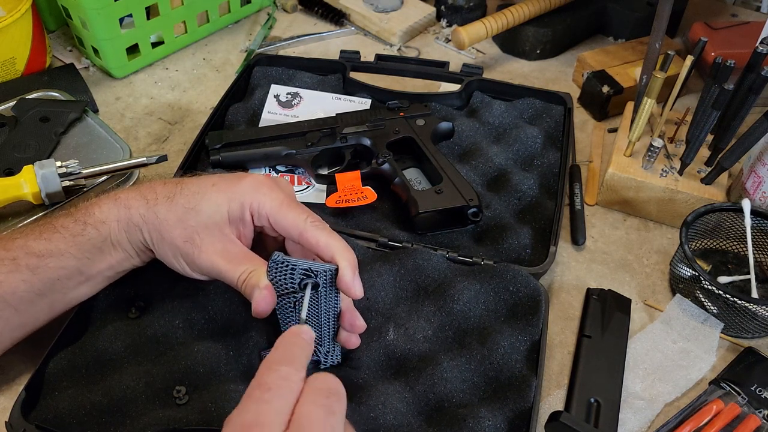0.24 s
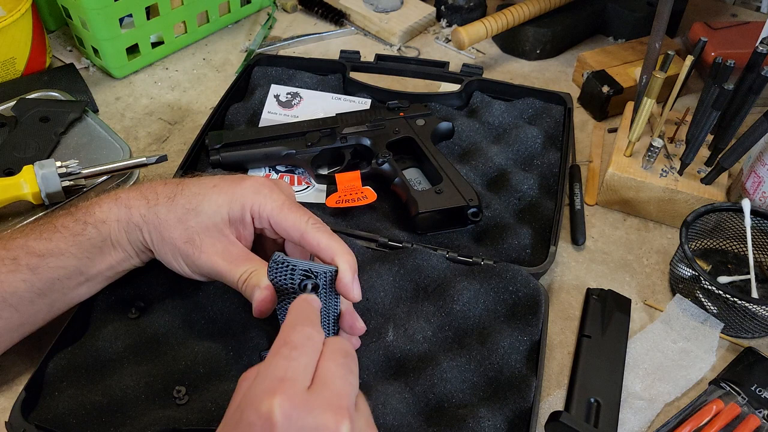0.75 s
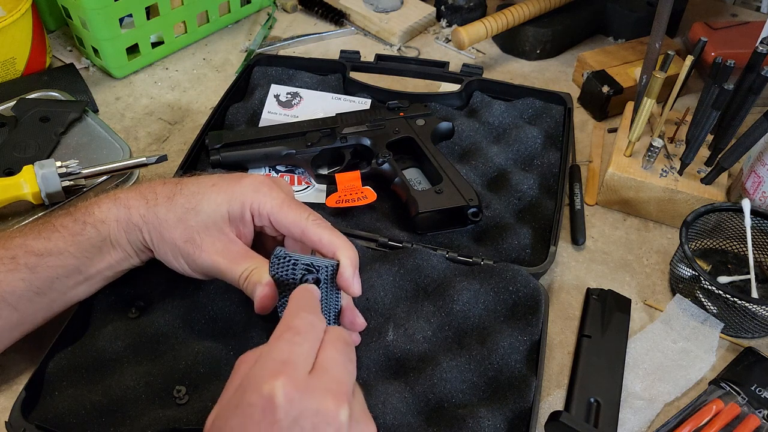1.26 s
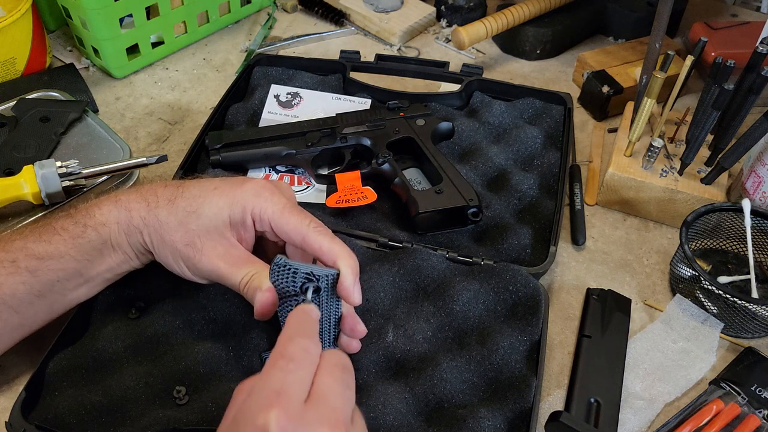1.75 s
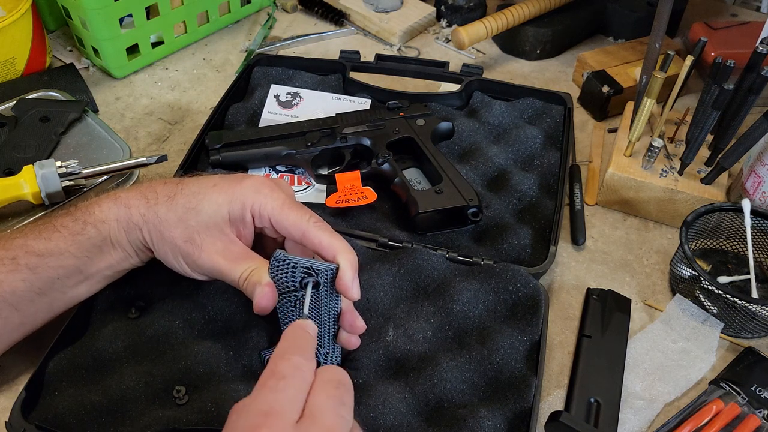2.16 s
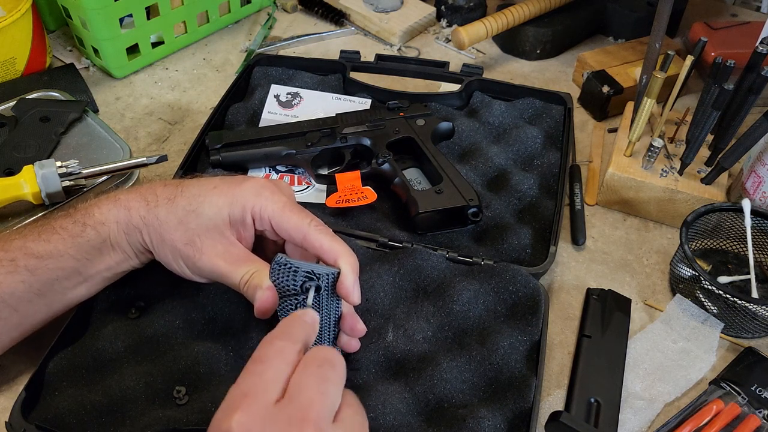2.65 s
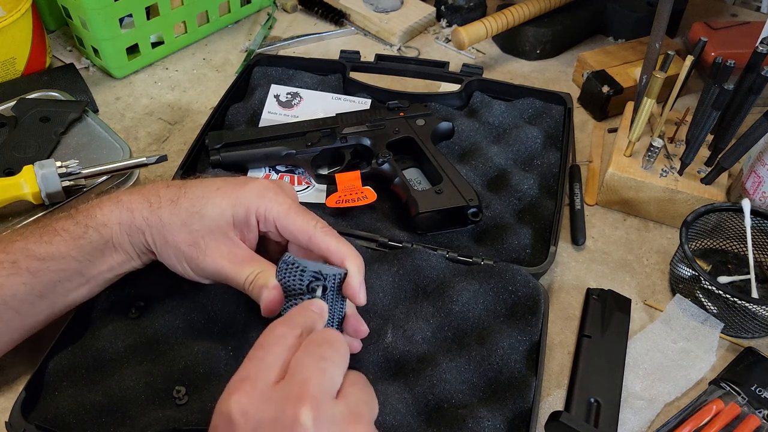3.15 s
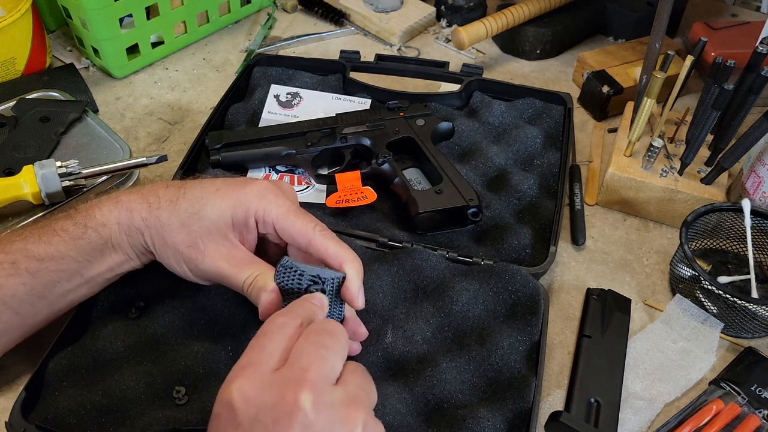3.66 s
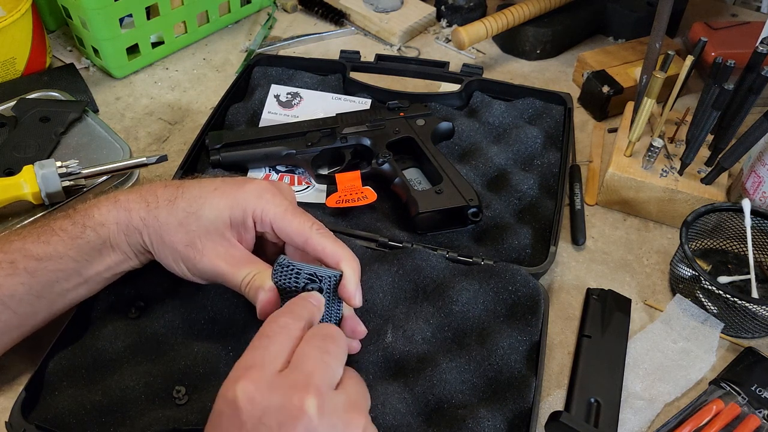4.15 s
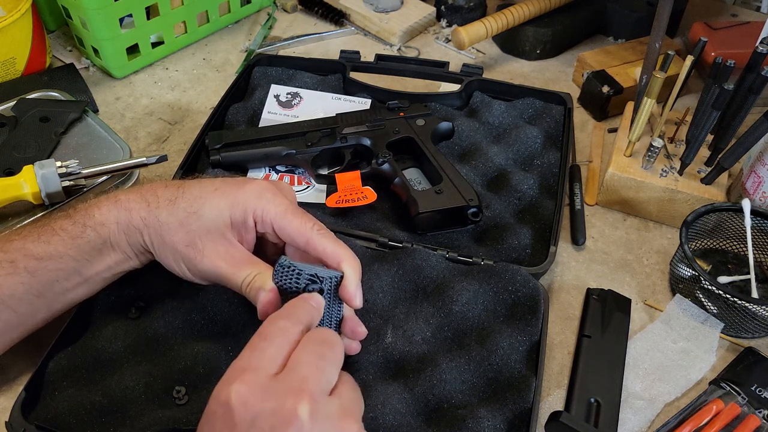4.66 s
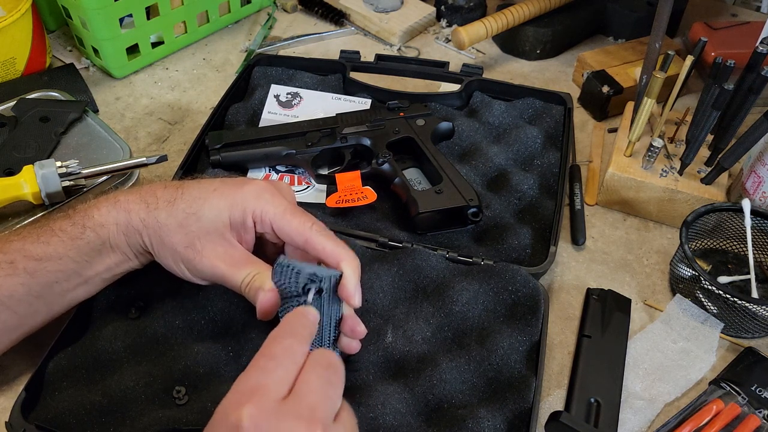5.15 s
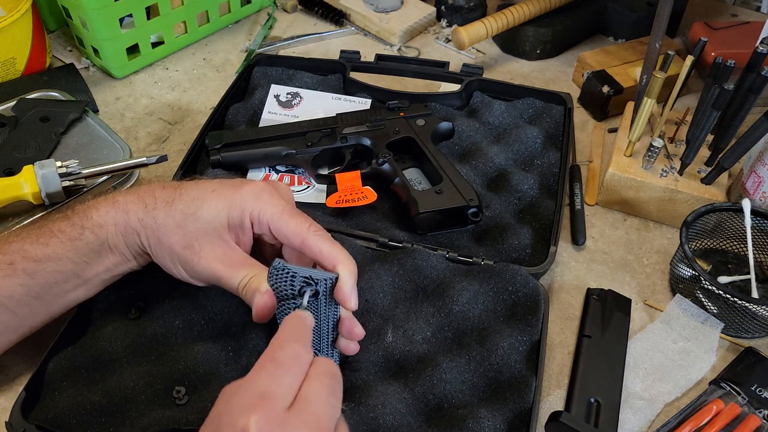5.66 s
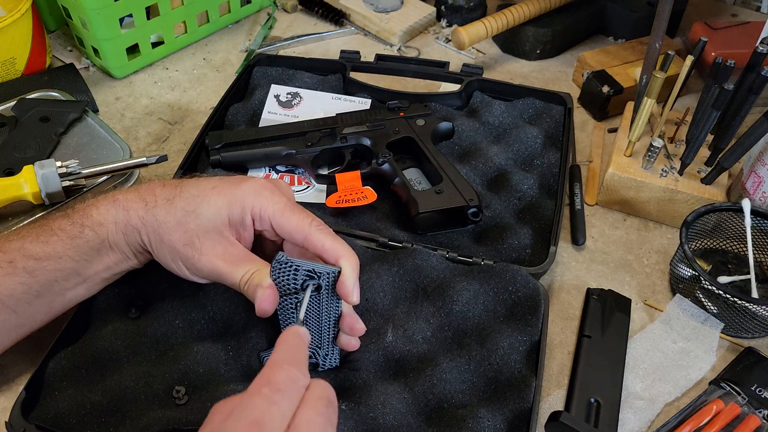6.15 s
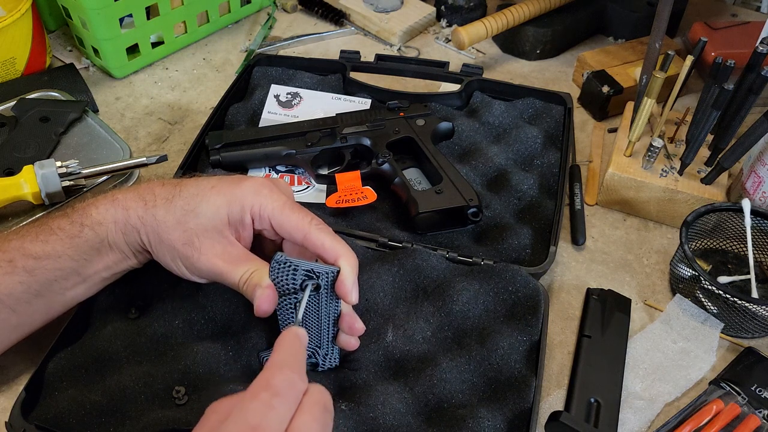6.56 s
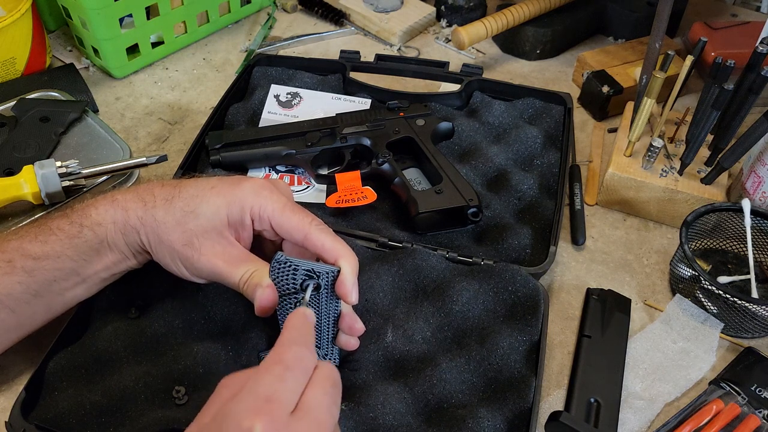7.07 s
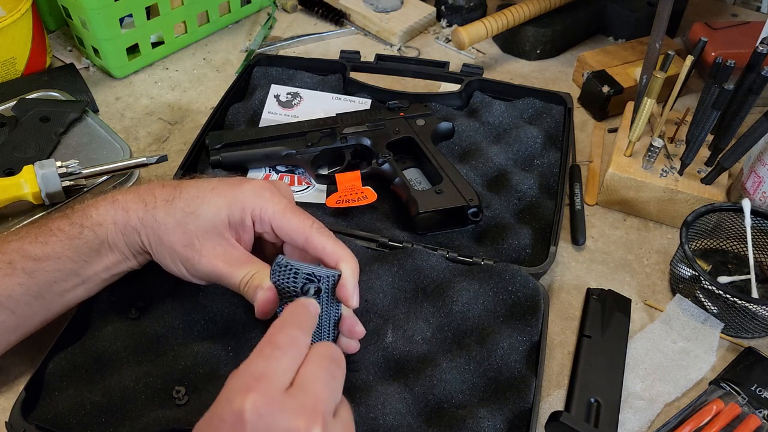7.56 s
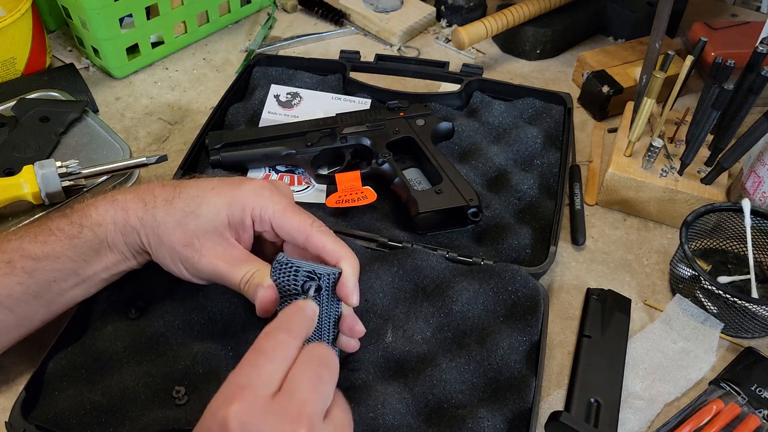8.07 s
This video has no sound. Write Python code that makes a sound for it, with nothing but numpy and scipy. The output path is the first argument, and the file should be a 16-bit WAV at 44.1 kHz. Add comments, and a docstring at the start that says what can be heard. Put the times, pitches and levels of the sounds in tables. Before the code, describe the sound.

Close, dry filing of a plastic piece: bright harsh pushes alternate with softer rising drawback scrapes, about two cycles a second, over faint hum.

```python
"""Filing a screw hole in plastic

A needle file rasps to and fro in the screw hole of a hand-held plastic grip panel, in a quiet workshop.
Its teeth tear off tiny chips (random clicks over noise) and set the panel ringing (a bank of modes); the blade's
gliding resonance rises on the pulls and falls on most pushes. Many pushes catch and bite a second time.
Under it: rim taps, soft bumps and rustle of the hands, still air, mains hum and a low drone."""
import sys
import numpy as np
from scipy import signal
from scipy.fft import rfft, irfft, next_fast_len
from scipy.io import wavfile
from scipy.ndimage import uniform_filter1d

SR = 44100
rng = np.random.default_rng(int(sys.argv[2]) if len(sys.argv) > 2 else 0)


def wav_out(sig):
    """Save sig, one row per channel (or a flat mono array), as 16-bit PCM at SR to the path in sys.argv[1]."""
    wavfile.write(sys.argv[1], SR, np.round(np.clip(np.atleast_2d(sig).T, -1, 1) * 32767).astype(np.int16))


N = 366471
TIME = np.arange(N) / SR  # seconds
SIZE = next_fast_len(N + 8192, True)  # transform length, with room for filter tails
HZ = np.fft.rfftfreq(SIZE, 1 / SR)
RECORDER_EDGE_HZ = 15900

# Still air of the workshop. Each row: frequency in Hz, relative level in dB.
AIR_COLOUR = [(20, -15), (90, -6.5), (200, -3), (400, -7.5), (1000, -11.5), (2000, -17), (4000, -18),
              (8000, -24), (16000, -30)]
# Mains hum. Each row: frequency in Hz, rms level in dB before the lean to the left.
HUM_PARTIALS = [(119.9, -70.5), (239.9, -79), (359.7, -85.5)]
# A low drone beside the hum, fading after an early swell. Each row: time in seconds, rms level in dB.
DRONE_LEVEL = [(0, -68), (.8, -70), (1.9, -64), (2.4, -75.5), (8.31, -79)]
# Ring of the workshop. Each row: frequency in Hz, time to fall by 60 dB in seconds.
ROOM_DECAY = [(200, 1), (1000, 0.22), (4000, 0.28), (14000, 0.17)]

# Low rustle of the working hands. Each row: time in seconds, basic level in dB.
RUSTLE_LEVEL = [(0.0, -66.5), (0.9, -75), (1.6, -73), (2.3, -72), (3.2, -70.5), (4.3, -67), (4.9, -68.5),
                (5.5, -70), (6.2, -73), (7.0, -71.5), (8.31, -75.5)]
# Colour of that rustle. Each row: frequency in Hz, relative level in dB.
RUSTLE_COLOUR = [(20, -21), (45, -26), (70, -10), (105, -3.5), (125, -23), (160, -16.5), (300, -51),
                 (1000, -72)]
# The hands take up the end of a stroke. Each row: start in seconds, level in dB before the lean to the left,
# pitch in Hz, decay time in seconds.
BUMPS = [(0.688, -63, 115, 0.031), (1.303, -69, 112, 0.026), (1.963, -55, 154, 0.012),
         (2.559, -58, 134, 0.011), (3.674, -65, 113, 0.017), (4.76, -53, 105, 0.014),
         (4.834, -52, 40.4, 0.02), (4.868, -53, 49.7, 0.015), (5.031, -61, 90, 0.018),
         (5.862, -57, 111, 0.027)]

# Broad colour beneath the panel's modes. Each row: frequency in Hz, left gain in dB, right gain in dB.
BROAD_COLOUR = [(253, -24, -25), (472, -27, -35), (995, -19.5, -15.5), (1640, -16.5, -18),
                (2900, -19, -14.5), (4550, -21.5, -19.5), (5620, -9, -8.5), (7070, -1.5, -5.5),
                (9150, -2, -7), (8960, -4.5, -12.5), (11770, -14, -16.5), (12530, -5, -11.5),
                (14100, -9.5, -10.5), (14500, -11, -14)]
# Modes of panel, file and cupped hand. Each row: frequency in Hz, width in Hz, lift at the left port in dB,
# lift at the right port in dB, extra left lead in radians.
PANEL_MODES = [(385, 67, 15.5, 15, 0.3), (556, 110, 9, 10.5, -0.2), (687, 190, 10, 2.5, 0.24),
               (820.6, 16.3, 7, 13, -2), (1007, 255, 8.5, 9, -0.02), (1128.6, 149, 12.5, 5.5, -2.5),
               (1252, 186, 14, 8.5, -0.18), (1856, 110, 5, 4.5, 0.5), (2175, 122, 9.5, -3.5, -0.85),
               (2448, 200, 11.5, 3, 0.5), (2679, 146, 13, 3, -2), (3050, 43, 12, 3, -0.7),
               (3185, 137, 14.5, 7, -1), (3409, 159, 12.5, 10, -6), (3658, 185, 16, 9, -2),
               (3880, 267, 14.5, 0, -3.5), (4160, 260, 8.5, 9.5, -1.1), (4570, 79, 12, 11.5, 0.5),
               (4757, 90, 14, 9.5, 2), (5190, 133, 10, 6.5, 0.4), (5417, 32, 17.5, -6, -1.8),
               (5890, 400, 8, 9, -0.6), (6220, 300, 6.5, 1, -0.3), (6515, 220, 7, 1, 0.7),
               (7040, 25, 9, -17, 1), (7630, 330, 6.5, 3.5, -1.4), (8380, 680, 4.5, 1, -0.34),
               (8240, 68, 1, 9.5, 0.5), (8800, 120, 2, 9, -2), (10320, 450, 7, 7.5, -2.5)]
# How the two microphone ports hear the panel. Each row: frequency in Hz, basic left lead in radians,
# likeness of the ports from 0 to 1.
PORTS = [(251, 1.86, 0.45), (783, 0.61, 0.39), (1107, 5.14, 0.99), (1626, 1.36, 0.51), (2780, 2.58, 0.47),
         (3845, 5.94, 0.73), (5100, 3.26, 0.3), (5970, 4.4, 0.52), (6700, 4.64, 0.65), (8300, 4.13, 0.62),
         (9500, 6.6, 0.27), (11000, 6.5, 0.38), (13200, 6.5, 0.26), (15900, 7, 0.1)]

# The file taps the rim of the hole. Each row: start in seconds, peak level in dB at the louder port,
# brightness in Hz.
TAPS = [(0.162, -47, 7000), (0.494, -44, 1300), (1.252, -31.5, 8000), (1.411, -57, 1310),
        (1.762, -46, 4500), (1.896, -35, 8000), (2.057, -61, 9000), (2.336, -41, 6000), (2.497, -33, 11000),
        (2.878, -53, 1206), (4.341, -52, 5000), (4.356, -43, 9000), (5.092, -45, 1510), (5.285, -40, 10000),
        (5.641, -41, 1420), (5.851, -29, 12000), (6.938, -34.5, 7000), (7.517, -40, 8000),
        (7.608, -48, 1200), (7.868, -51, 1400)]

# The file is pushed in, gathering speed. Each row: start in seconds, length in seconds, rise time in seconds,
# rasp of the teeth in dB, swell along the push in dB, and relative to the rasp: panel ring in dB,
# hollow of the hand in dB, low body in dB.
PUSHES = [(-0.062, 0.08, 0.024, -41.5, 0.0, -3, -16.5, -15),
          (0.461, 0.15, 0.036, -46, 0.5, -4.5, -18, -18.5),
          (1.139, 0.11, 0.024, -42, -4.5, -4, -12.5, -16.0),
          (1.754, 0.12, 0.025, -44.0, 2.5, -4.5, -15, -20.5),
          (2.336, 0.131, 0.027, -44.5, 2.5, -4.5, -19, -18.5),
          (2.925, 0.12, 0.04, -44.5, 6, -4.0, -15, -17), (3.507, 0.088, 0.026, -44.0, -1, -4.5, -13.0, -12),
          (4.046, 0.11, 0.029, -44.5, -3.5, -4, -15, -12.5), (4.593, 0.11, 0.042, -42.0, -4, -3, -15, -18),
          (5.157, 0.1, 0.033, -44.0, -2, -3, -15, -17), (5.694, 0.12, 0.03, -45, -9, -2.5, -12.5, -15),
          (6.228, 0.13, 0.047, -46.0, 5.5, -3, -12, -14.0), (6.795, 0.11, 0.04, -44, 0.5, -1, -10, -15.0),
          (7.363, 0.114, 0.032, -45.0, 5, -5.0, -14, -17.5),
          (7.884, 0.132, 0.043, -45.5, 7, -4.0, -14.0, -15)]
# The teeth catch and bite at once. Each row: start in seconds, length in seconds, rasp in dB,
# and relative to it: ring in dB, hollow in dB, body in dB.
BITES = [(0.039, 0.069, -43.5, -5.5, -18, -15), (0.611, 0.098, -44.5, -5.5, -14.5, -13.5),
         (1.105, 0.036, -62.5, 0, -11, -9), (1.264, 0.047, -39.5, -4.5, -9.5, -18),
         (1.892, 0.079, -41.5, -3.5, -10.0, -14.5), (2.486, 0.074, -41, -5, -17, -17.5),
         (3.052, 0.065, -45.5, -5, -16.5, -10.5), (3.6, 0.082, -48.5, -5.5, -15, -9.5),
         (4.159, 0.09, -48, -3.0, -17.5, -8.5), (4.72, 0.079, -46.5, -3.0, -15.0, -11),
         (5.281, 0.064, -45.5, -4.0, -12.5, -16), (5.844, 0.057, -43.5, -5, -8.5, -12.5),
         (6.406, 0.054, -44.5, -4, -9.0, -10), (6.93, 0.0094, -46, -4.5, -9, -5),
         (6.96, 0.053, -43.0, -4, -7.5, -12), (7.507, 0.01, -47, -3.0, -22, -7),
         (7.536, 0.027, -42.5, -3, -8, -18), (7.814, 0.028, -63.5, 2.5, -10, -5),
         (8.038, 0.05, -48, -5, -19, -11)]
# The file is drawn back; midway the hand eases off, almost lifts it, and it only drags. Each row: start in
# seconds, length in seconds, length of the firm part in seconds, rasp in dB, drop on easing in dB,
# dip of the lift in dB, and relative to the rasp: ring in dB, hollow in dB, body in dB.
PULLS = [(0.155, 0.22, 0.11, -51, 10, -2.5, -0.5, -10.5, -15),
         (0.827, 0.208, 0.1, -49.5, 9.5, -2, -3.0, -12.5, -16.5),
         (1.456, 0.19, 0.098, -49.5, 6.5, -4.5, -2.5, -14.0, -19.5),
         (2.058, 0.2, 0.091, -46.5, 9, -2.5, -3.5, -15.5, -18.5),
         (2.651, 0.2, 0.1, -48.5, 7.5, -3, -2.5, -17, -20.5),
         (3.218, 0.19, 0.087, -46.5, 9.5, -8, -3.5, -11.5, -11),
         (3.79, 0.18, 0.096, -47, 10.5, -3, -1.5, -15, -15),
         (4.33, 0.19, 0.098, -47.0, 10, -4, -3, -16, -17), (4.875, 0.19, 0.095, -47, 8.5, -2, -3, -14, -18),
         (5.428, 0.19, 0.082, -47, 11.5, -5, -3.5, -12.5, -16.5),
         (5.988, 0.19, 0.091, -49.5, 11, -3, -2, -10, -16.5),
         (6.521, 0.2, 0.095, -54, 11, -0.5, 0, -6, -13.5), (7.117, 0.17, 0.084, -52, 6, -1, -4, -10, -14.5),
         (7.649, 0.15, 0.11, -49.0, 19, -2.5, -2, -14, -16.5),
         (8.137, 0.162, 0.11, -51.5, 8.5, -1.5, 1.5, -8.5, -12.5)]

# Bands of every stroke: rasp, ring, hollow, body. Each row: low edge in Hz, high edge in Hz.
BAND_EDGES = [(4500, 20000), (1600, 4500), (900, 1600), (200, 900)]
# Power of the speed that sounds each of the four bands: the treble needs more speed than the body. No unit.
ATTACK_POWER = [1.46, 1.41, 1.53, 0.7]
# Braking time of the four bands, in seconds: the low body dies last.
RELEASE_S = [0.0076, 0.0098, 0.0099, 0.0136]
# Shared swell along a push in the four bands, in dB, added to the push's own.
PUSH_SWELL_DB = [0.5, -5, -0.5, 4]
# Colour of a pull once it only drags: lift of the four bands in dB.
DRAG_DB = [1, 3.6, -0.8, 3]
BITE_RISE_S, PULL_RISE_S, EASE_S = 0.0081, 0.02, 0.012
LIFT_AFTER_S, LIFT_WIDTH_S = 0.026, 0.025  # on easing, the file briefly almost lifts off

# A light pull lets the panel's main modes ring more than a hard push, which damps them.
# Each row: frequency in Hz, gain in dB.
LIGHT_TOUCH = [(1600, -4), (2300, 0), (2700, -2), (3500, 1), (4050, 1.5), (4600, -0.5), (5400, -1),
               (6500, -1), (9000, -1.5), (11000, -2), (16000, -3)]
# Edge of a bite under full pressure. Each row: frequency in Hz, gain in dB.
HARD_TOUCH = [(4500, -1.5), (8000, -3.5), (12000, -0.5), (16000, -3)]

# The blade's bending note as it slides through the hole. Each row: start in seconds, end in seconds,
# first pitch in Hz, last pitch in Hz, strength in dB relative to the usual blade ring.
SLIDES = [ (0.192, 0.365, 726, 2470, 4), (0.853, 0.981, 860, 2300, -6), (1.12, 1.247, 3580, 1680, -7),
          (1.474, 1.642, 950, 3340, -8.5), (1.773, 1.852, 3520, 1610, -17), (2.115, 2.274, 880, 3180, -12),
          (2.35, 2.457, 3520, 1700, -21), (2.72, 2.874, 1150, 3500, -6.5), (3.26, 3.435, 1010, 3470, -10),
          (3.823, 3.98, 1070, 4160, -10), (4.368, 4.516, 1100, 3800, -12), (4.615, 4.698, 3630, 1900, -25),
          (4.923, 5.066, 820, 4050, -7), (5.18, 5.245, 3320, 1540, -9), (5.412, 5.61, 1070, 3720, -10),
          (5.707, 5.784, 3200, 1200, -15), (6.021, 6.085, 870, 1920, -2), (6.252, 6.356, 3400, 1390, -11),
          (6.564, 6.627, 920, 1800, 7), (6.814, 6.905, 3100, 1360, -6), (7.135, 7.306, 855, 3470, -13),
          (7.35, 7.47, 3150, 1400, -16), (7.673, 7.763, 870, 3250, -7), (7.9, 7.983, 3300, 1400, -31),
          (8.18, 8.255, 855, 3320, 0)]
BLADE_WIDTH_HZ, BLADE_WIDENING = 230, 0.25  # widening: Hz of width per Hz of first pitch
# Early in a pull the blade's note passes the hollow of the hand.
HOLLOW_HZ, HOLLOW_DB, HOLLOW_WIDTH_S = 1100, 7.5, 0.014
# The grip slackens and the panel gives a boxy note. Each row: start in seconds, end in seconds,
# pitch in Hz, strength in dB.
BOXY_NOTES = [(0.63, 0.704, 684, -1), (3.076, 3.15, 820, -7), (3.23, 3.31, 610, 3), (3.52, 3.685, 575, 4),
              (4.083, 4.173, 630, 24), (4.17, 4.277, 570, 4)]


def gain_of(db):
    """Decibels to amplitude."""
    return 10 ** (np.asarray(db) / 20)


def evened(x):
    """Scales to rms 1."""
    return x / np.sqrt(np.mean(x ** 2) + 1e-20)


def column(values):
    """One value for each band, to be spread over time."""
    return np.array(values, float)[:, None]


def hump(t, width_s):
    """A bell of height 1 around t = 0."""
    return np.exp(-(t / width_s) ** 2)


def read(points, hz, axis=1):
    """One column of a spectrum, joined by lines on a log-frequency axis."""
    points = np.array(points, float)
    return np.interp(np.log(hz + 1), np.log(points[:, 0] + 1), points[:, axis])


def add(mix, s, sound):
    """Mixes a sound in at a time in seconds."""
    part = mix[max(round(s * SR), 0):][:len(sound)]
    part += sound[:len(part)]


def shaped(x, response):
    """Filters by a response given on HZ."""
    return irfft(rfft(x, SIZE) * response, SIZE)[..., :N]


def wander(rate_hz):
    """Smooth chance movement of rms 1: noise low-passed at a rate."""
    return evened(shaped(rng.standard_normal(N), 1 / (1 + (HZ / rate_hz) ** 4)))


def resonate(x, hz, width_hz):
    """A resonance of gain 1 that follows the curve hz: shift to zero frequency, smooth, shift back."""
    turn = np.exp(2j * np.pi * np.cumsum(hz) / SR)
    r = np.exp(-np.pi * width_hz / SR)
    smooth = signal.lfilter([1 - r], [1, -r], x / turn)
    return 2 * (turn * smooth).real


def workshop(air_db=-72, apart=1.0, waver_db=-0.1, lean_db=2.1):
    """Faint air noise, partly shared by the ports, and a slightly wavering mains hum of sine partials."""
    noise = rng.standard_normal(N) + apart * rng.standard_normal((2, N))
    air = gain_of(air_db) * evened(shaped(noise, gain_of(read(AIR_COLOUR, HZ))))
    hum = 0
    for hz, db in HUM_PARTIALS:
        hum = hum + np.sqrt(2) * gain_of(db) * np.sin(2 * np.pi * (hz * TIME + rng.random()))
    return (air + hum * gain_of(waver_db * wander(6))) * gain_of([[lean_db], [-lean_db]])


def drone(hz=110, width_hz=12):
    """A narrow, unsteady low note in the room: noise through two equal resonances."""
    note = np.full(N, hz)
    once = resonate(rng.standard_normal(N), note, width_hz)
    sound = evened(resonate(once, note, width_hz))
    return sound * gain_of(np.interp(TIME, *np.transpose(DRONE_LEVEL)))


def room(x, wet_db=-17):
    """A short diffuse tail of noise, each band dying at its own speed."""
    hz, t, z = signal.stft(rng.standard_normal((2, SR // 2)), SR, nperseg=256)
    fall_db = -60 * t / read(ROOM_DECAY, hz)[:, None]
    tail = signal.istft(z * gain_of(fall_db), SR, nperseg=256)[1]
    tail[:, :SR // 250] = 0  # the tail waits 4 ms
    return gain_of(wet_db) * signal.fftconvolve(x, tail / np.linalg.norm(tail[0]), axes=1)[:, :N]


def hands(rustle_db=-1, lean_db=2.5, lumps_db=1.0, lumps_hz=7, strain_db=4, strain_s=0.084):
    """Dull, lumpy noise of the grip, stronger around the end of each bite, and damped sine bumps."""
    out = evened(shaped(rng.standard_normal(N), gain_of(read(RUSTLE_COLOUR, HZ))))
    strain = np.max([hump(TIME - start - length, strain_s) for start, length, *_ in BITES], axis=0)
    level_db = rustle_db + np.interp(TIME, *np.transpose(RUSTLE_LEVEL)) + strain_db * strain
    out *= gain_of(level_db + lumps_db * wander(lumps_hz))
    t = np.arange(SR // 4) / SR
    for s, db, hz, decay in BUMPS:
        age = 2 * t / decay
        swell = age * np.exp(1 - age)
        add(out, s, gain_of(db) * swell * np.sin(2 * np.pi * hz * t))
    return out * gain_of([[lean_db], [-lean_db]])


def panel_response():
    """Causal response from the file's edge to the ports; each mode reaches them with its own strength and phase."""
    db = np.array([read(BROAD_COLOUR, HZ, axis=1), read(BROAD_COLOUR, HZ, axis=2)])
    lead = read(PORTS, HZ)
    for hz, width, left_db, right_db, extra_lead in PANEL_MODES:
        peak = 1 / (1 + (2 * (HZ - hz) / width) ** 2)
        db += np.outer([left_db, right_db], peak)
        lead += extra_lead * peak
    # minimum phase from the mean level of the ports
    cepstrum = irfft(np.log(gain_of(db.mean(0))), SIZE)
    phase = 2 * rfft(cepstrum[:SIZE // 2], SIZE).imag
    return gain_of(db) * np.exp(1j * np.array([phase + lead, phase]))


def taps(panel, decay_s=0.0019, crack=0.33):
    """Short noise scuffs against the rim ring the same panel; part of each reaches the ports as a bare crack."""
    out, t = np.zeros((2, N)), np.arange(2048) / SR
    onset = 16  # samples kept ahead of the ring
    ring = np.roll(irfft(panel, SIZE), onset, axis=1)[:, :len(t)]
    ring[:, onset] += crack * np.linalg.norm(ring, axis=1)
    for s, db, bright_hz in TAPS:
        band = [min(bright_hz / 2, 700), min(bright_hz, RECORDER_EDGE_HZ)]
        dull = signal.butter(2, band, "bandpass", fs=SR)
        scuff = signal.lfilter(*dull, rng.standard_normal(len(t)) * np.exp(-t / decay_s))
        tap = signal.fftconvolve(ring, scuff[None], axes=1)
        for port, sound in zip(out, tap / abs(tap).max()):
            add(port, s, gain_of(db) * sound)
    return out


def stroke_time(start, length):
    """Time since the start, through one stroke and its release; skips what lies before time 0."""
    return np.arange(max(-start, 0), length + 0.12, 1 / SR)


def stroke(t, length, rise_s, db):
    """Amplitude by band of one movement: the file gathers speed, cuts, and is braked."""
    speed = 1 - np.exp(-t / rise_s)
    braking = 1 / (1 + np.exp((t - length) / column(RELEASE_S)))
    return gain_of(db) * speed ** column(ATTACK_POWER) * braking


def push(start, length, rise_s, rasp_db, swell_db, *colour_db):
    """The level in dB changes evenly along a push, as the pressure does."""
    t = stroke_time(start, length)
    travel = np.minimum(t / length, 1) - .5
    db = rasp_db + column([0, *colour_db]) + (swell_db + column(PUSH_SWELL_DB)) * travel
    return stroke(t, length, rise_s, db)


def bite(start, length, rasp_db, *colour_db):
    """The file breaks free and cuts at once: a fast rise."""
    return stroke(stroke_time(start, length), length, BITE_RISE_S, rasp_db + column([0, *colour_db]))


def pull(start, length, firm_s, rasp_db, drop_db, lift_db, *colour_db):
    """A firm start, a near lift, then a light drag."""
    t = stroke_time(start, length)
    eased = .5 + .5 * np.tanh((t - firm_s) / (2 * EASE_S))
    db = rasp_db + column([0, *colour_db]) + (column(DRAG_DB) - drop_db) * eased
    lift = lift_db * hump(t - firm_s - LIFT_AFTER_S, LIFT_WIDTH_S)
    return stroke(t, length, PULL_RISE_S, db + lift)


def hollow_boost():
    """The hollow of the hand answers as the blade's rising note passes its pitch."""
    db = np.zeros(N)
    for start, end, first_hz, last_hz, _ in SLIDES:
        if last_hz > first_hz:
            passing = start + (end - start) * np.log(HOLLOW_HZ / first_hz) / np.log(last_hz / first_hz)
            near = slice(*np.searchsorted(TIME, [passing - 0.1, passing + 0.1]))
            db[near] += HOLLOW_DB * hump(TIME[near] - passing, HOLLOW_WIDTH_S)
    return gain_of(db)


def stroke_levels(unsteady_db=0.12, unsteady_hz=28):
    """Amplitude of rasp, ring, hollow and body through all strokes; the hand's pressure is never quite steady."""
    levels = np.zeros((len(BAND_EDGES), N))
    for movement, rows in ((push, PUSHES), (bite, BITES), (pull, PULLS)):
        for row in rows:
            for level, envelope in zip(levels, movement(*row)):
                add(level, row[0], envelope)
    levels[2] *= hollow_boost()
    return levels * gain_of(unsteady_db * wander(unsteady_hz))


def teeth(chips_per_s=9000, spread_db=4.0, rub=0.39, chatter_db=-1.08, chatter_hz=260):
    """Teeth tear off chips of uneven size (random clicks) over a fine rub (noise); the cut chatters."""
    size = gain_of(spread_db * np.minimum(rng.exponential(1, N), 4)) * rng.choice([-1, 1], N)
    chips = evened(size * (rng.random(N) < chips_per_s / SR))
    return evened(chips + rub * rng.standard_normal(N)) * gain_of(chatter_db * wander(chatter_hz))


def blade(cut, ring_db=13, wobble=0.086, flutter_db=1.0):
    """The blade's resonance glides, wobbling as it rocks in the hole, and colours the cut."""
    out = cut.copy()
    rocking = np.exp(wobble * wander(61))
    flutter = gain_of(flutter_db * wander(50))
    for start, end, first_hz, last_hz, db in SLIDES:
        during = slice(round(start * SR), round(end * SR))
        part = cut[during]
        note = np.geomspace(first_hz, last_hz, len(part)) * rocking[during]
        width = BLADE_WIDTH_HZ + BLADE_WIDENING * first_hz  # a push presses harder and damps the blade
        ring = resonate(resonate(part, note, width), note, width) * flutter[during]
        add(out, start, gain_of(ring_db + db) * ring * signal.windows.tukey(len(part), .2))
    return out


def boxy(cut, width_hz=85):
    """A loosely held panel lets one low mode ring."""
    out = cut.copy()
    for start, end, hz, db in BOXY_NOTES:
        part = cut[round(start * SR):round(end * SR)]
        ring = resonate(part, np.full(len(part), hz), width_hz)
        add(out, start, gain_of(db) * ring * signal.windows.tukey(len(part), .3))
    return out


def touch(cut):
    """Gives the pulls their lighter colour and the bites their edge."""
    out = cut
    for rows, colour in ((PULLS, LIGHT_TOUCH), (BITES, HARD_TOUCH)):
        spans = [(TIME > start) & (TIME < start + length + 2 * max(RELEASE_S)) for start, length, *_ in rows]
        during = np.any(spans, axis=0)
        out = np.where(during, shaped(cut, gain_of(read(colour, HZ))), out)
    return out


def patches(shape, frames, bins):
    """A smooth random field of rms 1 over frequency and time."""
    field = rng.standard_normal(shape)
    for axis, size in ((0, bins), (0, bins), (1, frames), (1, frames)):
        field = uniform_filter1d(field, size, axis=axis)
    return evened(field)


def shifting_contact(x, single_db=2.7, groups_db=1.5):
    """As the contact point moves, single overtones and whole groups of them are fed more or less."""
    hz, t, z = signal.stft(x, SR, nperseg=1024, noverlap=768)
    single = single_db * patches(z.shape[1:], frames=22, bins=2)
    groups = groups_db * patches(z.shape[1:], frames=10, bins=16)
    depth = np.interp(hz, [300, 3000], [.6, 1])  # the lows shift less
    fed = z * gain_of(depth[:, None] * (single + groups))
    return signal.istft(fed, SR, nperseg=1024, noverlap=768)[1][:, :N]


def snags(per_s=55, decay_s=0.0066, depth_db=0.74):
    """The teeth catch at once and let go gradually: a gain with sudden rises."""
    catches = rng.uniform(0.16, 1, N) * (rng.random(N) < per_s / SR)
    grip = signal.lfilter([1], [1, -np.exp(-1 / (decay_s * SR))], catches)
    return gain_of(depth_db * evened(grip - grip.mean()))


def rasp(panel, trim_db=(0, 0, 0, -.5)):
    """Both walls of the hole are cut; the panel rings, as loud as each stroke presses."""
    walls = np.array([boxy(blade(teeth())), boxy(blade(teeth()))])
    near, far = rfft(shifting_contact(touch(walls)), SIZE)
    same = np.clip(read(PORTS, HZ, axis=2), 0, 1)
    # the right port hears a blend of both walls, by its likeness to the left
    ringing = panel * np.array([near, same * near + np.sqrt(1 - same ** 2) * far])
    out = np.zeros((2, N))
    for (low, high), level, db in zip(BAND_EDGES, stroke_levels(), trim_db):
        share = 1 / (1 + (HZ / high) ** 20) - 1 / (1 + (HZ / low) ** 20)
        band = irfft(ringing * share, SIZE)[:, :N]
        # even out the slow level, so that the strokes alone set it
        power = uniform_filter1d(uniform_filter1d(band.mean(0) ** 2, size=1100), size=700)
        out += band * level * gain_of(db) / np.sqrt(abs(power) + 1e-12)
    return out * snags()


def scene():
    """File and panel close to the microphone, in the workshop."""
    panel = panel_response()
    filing = rasp(panel) + taps(panel)
    return filing + room(filing) + hands() + workshop() + drone()


def record(dry):
    """The recorder's band limit: a steep low-pass."""
    low_pass = signal.firwin(511, RECORDER_EDGE_HZ, window=("kaiser", 9), fs=SR)
    return signal.oaconvolve(dry, low_pass[None], "same")


dry = scene()
out = record(dry)
wav_out(out)
```